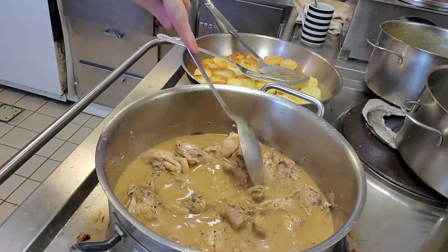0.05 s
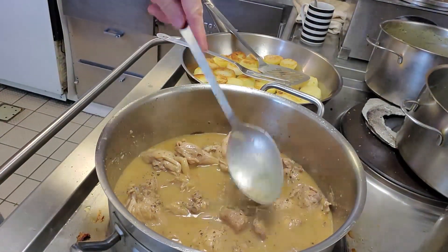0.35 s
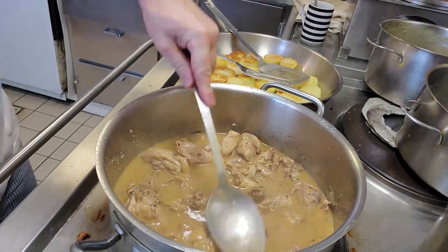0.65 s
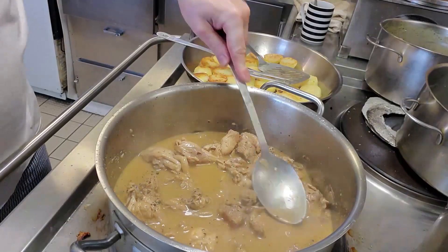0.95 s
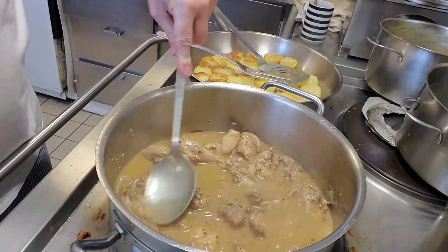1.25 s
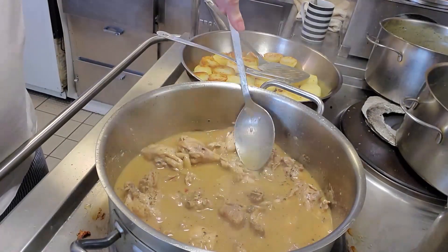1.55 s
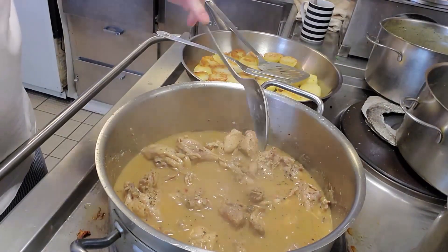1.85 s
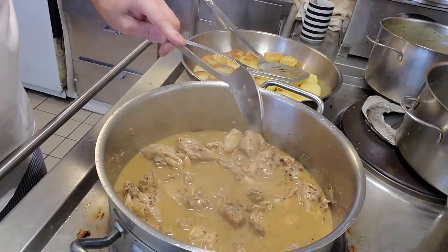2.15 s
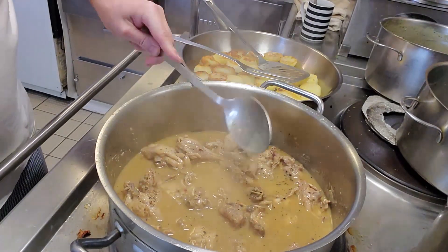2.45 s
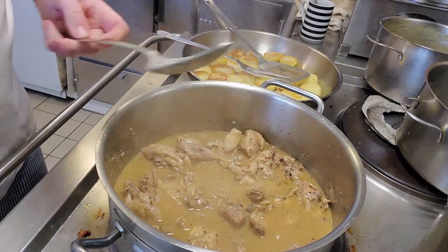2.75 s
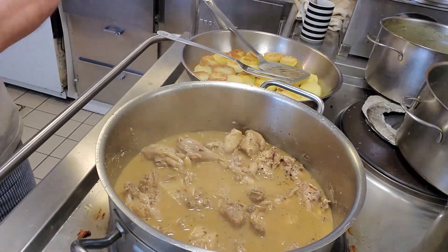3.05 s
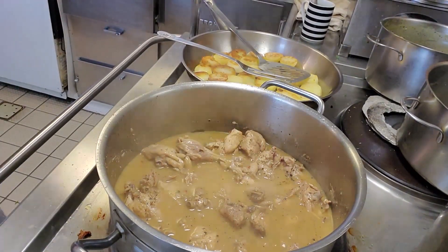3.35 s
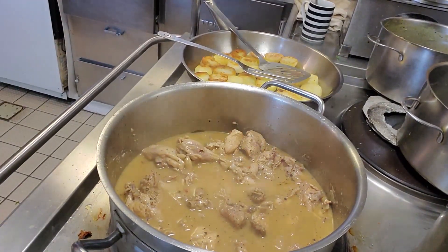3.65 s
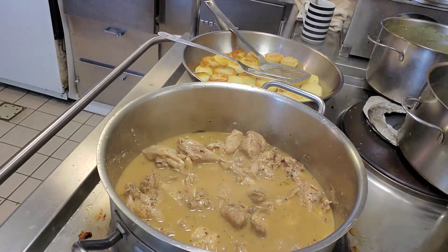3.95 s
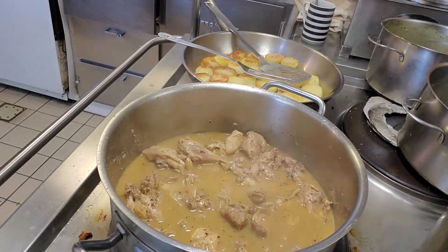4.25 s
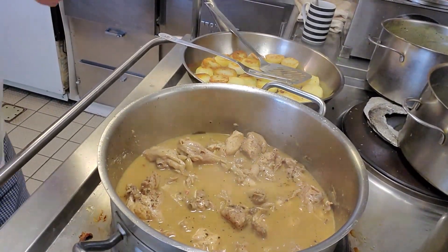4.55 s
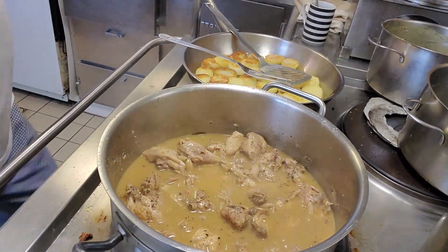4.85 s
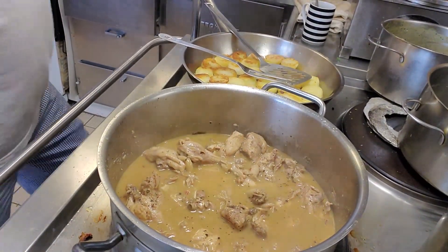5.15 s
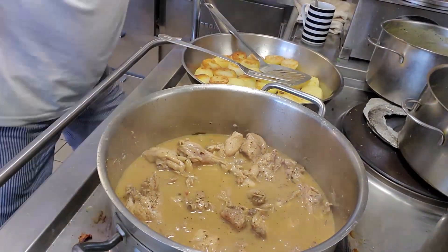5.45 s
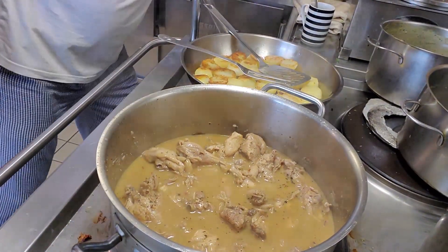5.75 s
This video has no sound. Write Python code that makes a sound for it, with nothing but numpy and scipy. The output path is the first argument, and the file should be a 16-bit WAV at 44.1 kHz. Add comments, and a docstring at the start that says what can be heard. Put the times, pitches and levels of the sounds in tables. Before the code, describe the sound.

In a ship's galley, engines rumble steadily and an extractor hood blows. A dull clack of kitchenware comes first, followed by a few softer ones. A steel serving spoon is then knocked three times on the rim of a big stew pot, which rings and thumps on the stove. After a pause, the spoon is laid on a steel counter with a few quick clinks. The hits are close and slightly to the left.

```python
"""A dull clack of kitchenware over the steady drone of a ship's galley: engines rumble through the
deck and an extractor hood blows. After a few softer clacks, a steel serving spoon is knocked three
times on the rim of a big stew pot to shake off the sauce; spoon, rim and wall ring, and the pot thumps
on the stove. Last, the spoon is laid down with a few clinks on a steel counter to the left.
Each hit is a set of decaying modes plus a burst of noise that trails off into the room."""
import sys
import numpy as np
from scipy import signal
from scipy.fft import rfft, irfft, next_fast_len
from scipy.io import wavfile
from scipy.ndimage import uniform_filter1d, minimum_filter1d

SR = 44100
rng = np.random.default_rng(int(sys.argv[2]) if len(sys.argv) > 2 else 0)


def int16_out(signal):
    """Quantize to a 16-bit WAV file."""
    q = np.round(np.clip(np.atleast_2d(signal).T, -1, 1) * 32767)
    wavfile.write(sys.argv[1], SR, q.astype(np.int16))


N = 265041
TIME = np.arange(N) / SR
RING_SIZE = SR * 3 // 4
RING_TIME = TIME[:RING_SIZE]

# Levels are relative. Pan is left minus right, so positive sits to the left.
# engine rumble through the hull: f/Hz, level/dB
RUMBLE_SPECTRUM = [(20, -38), (30, -26), (41, -8.5), (49, -1), (59, 2.5), (68, -3), (87, -1), (94, -15.5),
                   (103, -9), (118, -6), (143, -24), (195, -16.5), (235, -30.5), (400, -42)]
# shaft, firing and fan tones: f/Hz, level/dB, pan/dB
MACHINE_TONES = [(35, -44.5, 2), (50, -29.5, 0.5), (59, -30, 1), (124.1, -29.5, -1.5), (147.4, -43.5, -5),
                 (163.3, -44, -4.5), (198.5, -41.5, 4.5), (272.7, -53.5, 14), (303.8, -52, 15),
                 (340.8, -46.5, 2), (486.4, -48.5, 1), (1830, -56, 6)]
# air rushing through the hood: f/Hz, level/dB
HOOD_SPECTRUM = [(60, -10), (200, 6.5), (260, -1.5), (310, -3), (345, 3.5), (450, -3.5), (520, 1),
                 (690, -9), (1200, -12.5), (2000, -16), (3600, -21.5), (5500, -32.5), (11000, -37.5),
                 (15500, -44)]
# where the hood sits, band by band: f/Hz, pan/dB
HOOD_PAN = [(150, 5.6), (270, 2.7), (480, 1.3), (800, 4.9), (1500, 7.8), (4000, 7.8), (7000, 6.8),
            (11000, 3.2), (15000, 4.5)]
# how alike the hood is on both sides: f/Hz, correlation
HOOD_CORRELATION = [(150, 0.84), (300, 0.92), (600, 0.7), (1200, 0), (12000, 0)]
# resonances of the hood's duct: f/Hz, width/Hz, lift/dB
DUCT_RESONANCES = [(559, 16, 3.5), (871, 19, 6.5), (940, 23, 3.5), (1032, 32, 4), (1835, 23, -1.5),
                   (3240, 470, 1)]
# the galley's reverb time: f/Hz, t60/s
GALLEY_T60 = [(200, 0.42), (1000, 0.52), (4000, 0.36), (9000, 0.26), (16000, 0.21)]

# dull clacks of kitchenware: t/s, level/dB, pitch/Hz, lift at that pitch/dB, ring/dB, treble/dB
CLACK_HITS = [(0.1427, -0.5, 1460, 2, -1, -10), (1.1416, -41, 2100, 0, -12, 21),
              (1.3155, -23.5, 3920, 4, -6, 5), (1.5372, -12, 2190, 8, -1.5, 6),
              (1.6395, -35.5, 2100, 0, -12, 25)]
# the kitchenware's short ring: f/Hz, level/dB, t60/s
CLACK_MODES = [(510, -23.5, 0.19), (1560, -36, 0.16), (1844, -16.5, 0.06), (2030, -22, 0.13),
               (2310, -29, .18), (2910, -38, 0.33), (3520, -30, .16), (3830, -29.5, 0.22),
               (5420, -27, 0.13), (5930, -24, 0.066)]
# crowded fast modes of a clack: f/Hz, level/dB
CLACK_SPECTRUM = [(300, 0), (900, -11), (1500, -4), (2700, -4.5), (4200, -5), (5000, -8), (6000, -11),
                  (7500, -18), (11000, -27), (16000, -42)]

# spoon landing on the counter: t/s, level/dB, counter thud/dB, treble/dB
CLINK_HITS = [(3.6840, -26, -6, 4.5), (3.7380, -3.5, 1.5, -11), (3.7678, -3, 4.5, -8),
              (3.8380, -12, -8, -1.5), (3.9085, -10, -5, -2), (3.9140, -6.5, -8, 8.5)]
# the spoon ringing freely: f/Hz, level/dB, t60/s
SPOON_MODES = [(850, -34, 0.39), (1863, -34, 0.63), (2175, -41, 0.67), (2290, -38, 0.27), (2850, -35, 0.14),
               (2870, -31, .35), (3420, -36, 0.27), (3730, -33, 0.16), (3770, -35, 0.5), (3920, -34, 0.22),
               (4923, -32, 0.27), (5200, -34.5, 0.15), (8400, -49, 0.19), (8550, -32.5, 0.15),
               (9300, -45, 0.18), (9620, -32, 0.16), (10200, -42, 0.29), (10230, -37, 0.17),
               (10410, -43, 0.23), (11000, -41, 0.2), (11500, -51, 0.2), (11940, -36.5, 0.26),
               (13150, -41, 0.18), (14300, -40, .2)]
# thud of the steel counter: f/Hz, level/dB, t60/s
COUNTER_MODES = [(1288, -24.5, 0.1), (1310, -26.5, 0.08), (1624, -30, 0.13)]
# crowded fast modes of a clink: f/Hz, level/dB
CLINK_SPECTRUM = [(300, -16), (850, -11), (1400, -7), (2400, -13), (3500, -11.5), (4500, -14), (5500, -15),
                  (7200, -18), (10000, -15), (13000, -36), (16000, -27)]

# spoon on the rim, three like strokes of the wrist: t/s, level/dB, rim ring/dB, wall ring/dB
KNOCK_HITS = [(2.0357, -1.5, -2, 0), (2.2630, -2.5, 0, -22), (2.4790, -2.6, 0, -13)]
# the held spoon and the rim under it: f/Hz, level/dB, t60/s
RIM_MODES = [(367, -22, 0.21), (530, -22, 0.39), (689.6, -12.5, 0.26), (732, -12.5, 0.14), (761, -19, 0.3),
             (852, -24, 0.42), (1220, -29.5, .2), (1350, -19.5, 0.19), (1398, -19.5, 0.18),
             (1442, -18, 0.14), (2090, -33, 0.33), (2260, -30.5, 0.33), (2630, -32, 0.27),
             (3340, -21.5, 0.072), (3620, -16.5, 0.052), (4980, -17, 0.05), (5200, -28, 0.1),
             (5580, -30, 0.1), (8450, -37, 0.068), (10740, -32.5, 0.042)]
# the pot wall above the sauce: f/Hz, level/dB, t60/s
WALL_MODES = [(572, -24.5, 0.53), (809, -22, 0.96), (1136, -28.5, 0.65), (1397, -19, 0.44)]
# the heavy pot thumping on the stove top: f/Hz, level/dB, t60/s
THUMP_MODES = [(160, -15.5, 0.17), (212, -17.5, 0.15), (277, -27.5, 0.17), (410, -24, 0.082)]
# crowded fast modes of a knock: f/Hz, level/dB
KNOCK_SPECTRUM = [(140, -17), (350, 1), (700, 11.5), (1050, 0.5), (1400, 1), (1700, -7), (2400, -4.5),
                  (4200, -7), (5100, -0.5), (6800, -9.5), (10500, -14), (16000, -22)]

# treble colour of the mix, left then right: notch/Hz, width/Hz, peak/Hz, width/Hz
TREBLE_EQ = [(7425, 650, 8300, 1620), (8160, 1150, 10400, 1800)]


def from_db(db):
    """Decibels to gain."""
    return 10 ** (np.asarray(db) / 20)


def at_hz(points, hz):
    """Read a curve along log frequency."""
    x, y = np.transpose(points)
    return np.interp(np.log(np.maximum(hz, 1)), np.log(x), y)


def coloured(noise, gain_of_hz):
    """Give noise a spectrum."""
    n = noise.shape[-1]
    size = next_fast_len(n)
    gain = gain_of_hz(np.fft.rfftfreq(size, 1 / SR))
    return irfft(rfft(noise, size) * gain, size)[..., :n]


def pan(pan_db):
    """Left and right gains."""
    return from_db(np.array([[.5], [-.5]]) * pan_db)


def decay(t60):
    """Free decay after a hit, 60 dB down in t60 seconds."""
    return from_db(-60 * RING_TIME / t60)


def drift(per_s):
    """A slow random wander of spread about 1."""
    knots = rng.standard_normal(400)
    return np.interp(TIME * per_s, np.arange(len(knots)), knots)


def bump(hz, centre_hz, width_hz):
    """The shape of a resonance, 1 on top."""
    return 1 / (1 + (2 * (hz - centre_hz) / width_hz) ** 2)


def treble_share(hz, corner_hz=6500):
    """High shelf: how far a frequency depends on the hardness of the contact."""
    return hz ** 4 / (hz ** 4 + corner_hz ** 4)


def add(out, start_s, sound):
    """Drop a sound into the mix on its cue."""
    start = int(start_s * SR)
    out[:, start:start + sound.shape[-1]] += sound[:, :N - start]


def engines(rumble_db=8, waver_db=3.5, wander_turns=0.056):
    """The low bed: hull rumble, alike on both sides, and machine tones wavering in pitch and level."""
    def rumble_gain(hz):
        return from_db(rumble_db + at_hz(RUMBLE_SPECTRUM, hz)) * (hz < RUMBLE_SPECTRUM[-1][0])
    out = coloured(rng.standard_normal(N), rumble_gain)
    for hz, db, pan_db in MACHINE_TONES:
        turns = hz * TIME + wander_turns * drift(per_s=1.97) + rng.random()
        level = np.sqrt(2) * from_db(db + waver_db * drift(per_s=4))
        out = out + level * pan(pan_db) * np.sin(2 * np.pi * turns)
    return out


def extractor_hood(air_db=-19.0, flutter_db=0.85):
    """Air rushing in a resonant duct, narrow in the bass and wide in the treble."""
    def air_gain(hz, sign):
        duct_db = sum(db * bump(hz, centre, width) for centre, width, db in DUCT_RESONANCES)
        level = from_db(air_db + at_hz(HOOD_SPECTRUM, hz) + duct_db)
        share = np.sqrt((1 + sign * at_hz(HOOD_CORRELATION, hz)) / 2)
        return level * pan(at_hz(HOOD_PAN, hz)) * share
    mid = coloured(rng.standard_normal(N), lambda hz: air_gain(hz, 1))
    side = coloured(rng.standard_normal(N), lambda hz: air_gain(hz, -1))
    flutter = from_db(flutter_db * drift(per_s=2.63))
    return (mid + np.array([side[0], -side[1]])) * flutter


def ring(modes, treble_db=0, uneven_db=1, echo_db=-10, echo_t60=0.3):
    """Struck modes; the galley's echoes add to each an unsteady copy, different on each side."""
    out = np.zeros((2, RING_SIZE))
    knots = np.linspace(0, RING_TIME[-1], 50)
    echo_level = from_db(echo_db) * (decay(echo_t60) - decay(0.012))
    for hz, db, t60 in modes:
        # short waves reach the two sides out of step
        phase = rng.uniform(0, 2 * np.pi) + rng.normal(0, 1, 2) * min(hz / 1700, 1)
        gain = from_db(db + treble_db * treble_share(hz) + uneven_db * rng.normal(0, 1, 2))
        scatter = rng.normal(0, 1, (2, len(knots), 2)) @ [1, 1j] / np.sqrt(2)
        wave = np.exp(2j * np.pi * hz * RING_TIME)
        for side in range(2):
            direct = decay(t60) * np.exp(1j * phase[side])
            echo = echo_level * np.interp(RING_TIME, knots, scatter[side])
            out[side] += gain[side] * ((direct + echo) * wave).real
    return out


def mode_ripple(spread_db):
    """The many small peaks and dips of one steel object, flattening in the bass: f/Hz, level/dB."""
    hz = np.linspace(100, 16000, 190)
    ripple_db = spread_db * (2 * rng.random(len(hz)) - 1)
    return np.c_[hz, ripple_db * np.minimum(hz / 2500, 1)]


def clatter(spectrum, ripple, treble_db, crack_db, crack_t60, body_db, body_t60, room_db):
    """Modes too crowded to tell apart: a crack, a short body and a room tail that dies band by band."""
    def noise_gain(hz):
        return from_db(at_hz(spectrum, hz) + at_hz(ripple, hz) + treble_db * treble_share(hz))
    noise = coloured(rng.standard_normal((2, RING_SIZE)), noise_gain)
    crack = from_db(crack_db) * decay(crack_t60)
    body = from_db(body_db) * decay(body_t60)
    centres, t60s = np.transpose(GALLEY_T60)
    out = 0
    for weights, t60 in zip(np.eye(len(centres)), t60s):
        band = coloured(noise, lambda hz: at_hz(np.c_[centres, weights], hz))
        tail = from_db(room_db) * decay(t60)
        out = out + band * np.sqrt(crack ** 2 + body ** 2 + tail ** 2)
    return out


def kitchenware_clacks(pitch_width_hz=450, snap_db=-12, snap_t60=0.017, pan_db=5):
    """Damped contacts, each with one broad pitch that snaps and dies at once."""
    out = np.zeros((2, N))
    hz, ripple_db = mode_ripple(spread_db=1).T
    for start_s, db, pitch_hz, lift_db, ring_db, treble_db in CLACK_HITS:
        pitched_ripple = np.c_[hz, ripple_db + lift_db * bump(hz, pitch_hz, pitch_width_hz)]
        noise = clatter(CLACK_SPECTRUM, pitched_ripple, treble_db, crack_db=-2, crack_t60=0.035,
                        body_db=-10, body_t60=0.22, room_db=-19.5)
        snap = from_db(snap_db + lift_db) * decay(snap_t60) * np.sin(2 * np.pi * pitch_hz * RING_TIME)
        tones = from_db(ring_db) * ring(CLACK_MODES)
        add(out, start_s, from_db(db) * pan(pan_db) * (tones + snap + noise))
    return out


def spoon_laid_down(pan_db=8.5, pan_per_treble=0.12):
    """The spoon's bowl bounces on the counter, then the handle drops with a bright clink."""
    out = np.zeros((2, N))
    ripple = mode_ripple(spread_db=12.5)
    for start_s, db, thud_db, treble_db in CLINK_HITS:
        spoon = ring(SPOON_MODES, treble_db, echo_db=-4)
        counter = from_db(thud_db) * ring(COUNTER_MODES, echo_db=-7.5)
        noise = clatter(CLINK_SPECTRUM, ripple, treble_db, crack_db=-7.5, crack_t60=0.041,
                        body_db=-16, body_t60=0.091, room_db=-8.5)
        place = pan(pan_db - pan_per_treble * treble_db)  # bright hits sit nearer the centre
        add(out, start_s, from_db(db) * place * (spoon + counter + noise))
    return out


def rim_knocks(treble_db=-2.5, pan_db=4.5):
    """The spoon's shank lands on the rim; how much the pot wall rings depends on the spot it hits."""
    out = np.zeros((2, N))
    ripple = mode_ripple(spread_db=0)
    for start_s, db, rim_db, wall_db in KNOCK_HITS:
        rim = from_db(rim_db) * ring(RIM_MODES, treble_db)
        wall = from_db(wall_db) * ring(WALL_MODES)
        noise = clatter(KNOCK_SPECTRUM, ripple, treble_db, crack_db=2, crack_t60=0.025,
                        body_db=-12, body_t60=0.19, room_db=-12)
        thump = ring(THUMP_MODES)
        add(out, start_s, from_db(db) * (pan(pan_db) * (rim + wall + noise) + thump))
    return out


def from_the_right(x, lag_s=0.00031):
    """Long waves pass the right side first and reach the left a moment later."""
    return np.array([np.interp(TIME - lag_s, TIME, x[0]), x[1]])


def from_the_left(x, band_hz=(2200, 7000), shade=0.57):
    """The right side is shaded from the short waves of a close source, so it sounds duller."""
    bandpass = signal.butter(1, band_hz, "band", fs=SR, output="sos")
    short_waves = signal.sosfilt(bandpass, x[1] + 1e-18)
    return np.array([x[0], x[1] - shade * short_waves])


def scene():
    """Spoon, pot and kitchenware up front, over a bed of engines and hood."""
    hits = from_the_left(rim_knocks() + kitchenware_clacks()) + spoon_laid_down()
    return hits + from_the_right(engines()) + extractor_hood()


def notch_and_peak(x, notch_hz, notch_width_hz, peak_hz, peak_width_hz):
    """Colour the treble with a notch and a peak just above it; the bass keeps its level."""
    def resonance(hz, width_hz):
        radius = np.exp(-np.pi * width_hz / SR)
        return np.array([1, -2 * radius * np.cos(2 * np.pi * hz / SR), radius * radius])
    notch, peak = resonance(notch_hz, notch_width_hz), resonance(peak_hz, peak_width_hz)
    return signal.lfilter(notch / notch.sum(), peak / peak.sum(), x)


def limiter(x, ceiling=0.83, window=32):
    """The gain ducks for about a millisecond round any peak that would pass the ceiling."""
    allowed = np.minimum(1, ceiling / (np.abs(x).max(axis=0) + 1e-9))
    return x * uniform_filter1d(minimum_filter1d(allowed, window), window)


def record(dry):
    """The master chain: a 5 ms fade-in, treble colour, peak limiting and a steep top cut."""
    fade_in = np.minimum(TIME / .005, 1)
    shaped = np.array([notch_and_peak(x * fade_in, *eq) for x, eq in zip(dry, TREBLE_EQ)])
    top_cut = signal.ellip(10, .1, 80, 15650, fs=SR, output="sos")
    return signal.sosfilt(top_cut, limiter(shaped))


dry = scene()
out = record(dry)
int16_out(out)
```